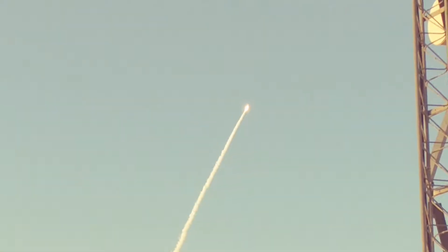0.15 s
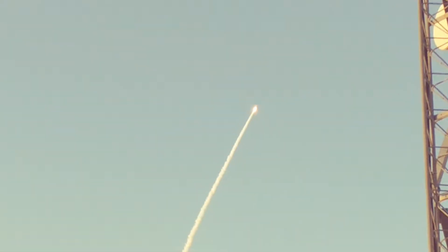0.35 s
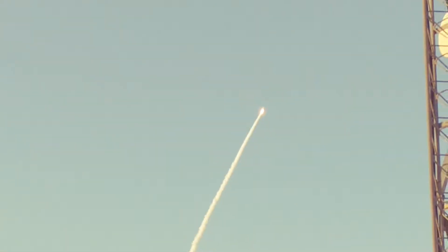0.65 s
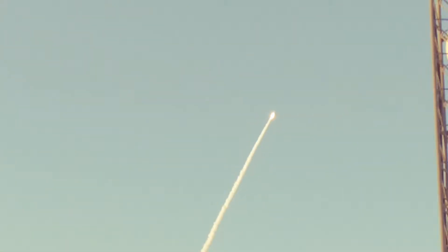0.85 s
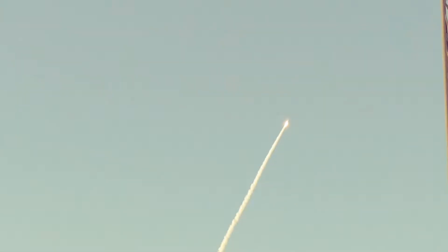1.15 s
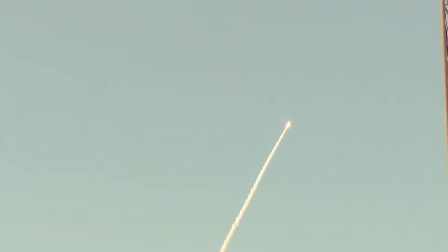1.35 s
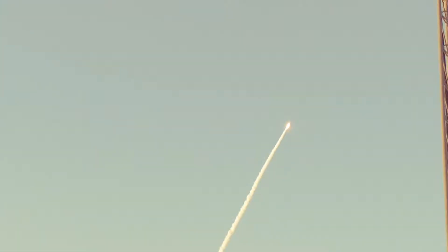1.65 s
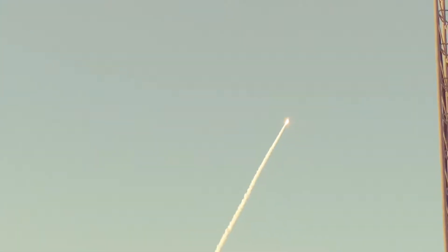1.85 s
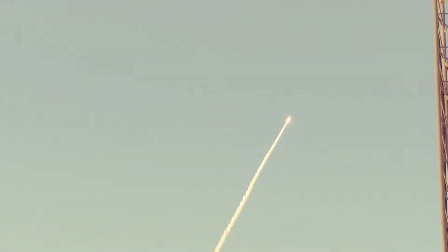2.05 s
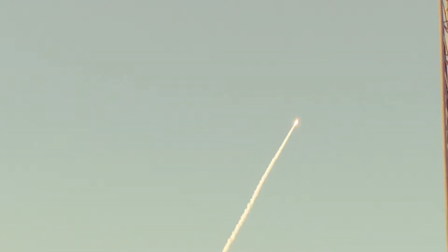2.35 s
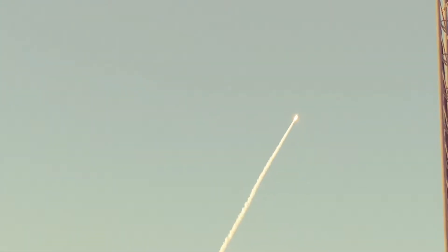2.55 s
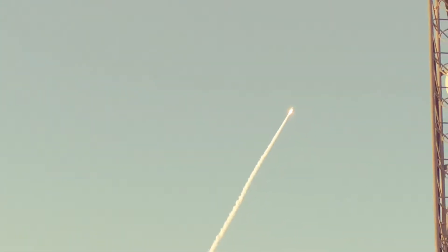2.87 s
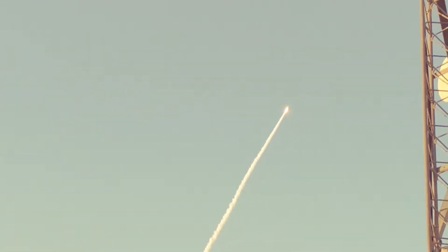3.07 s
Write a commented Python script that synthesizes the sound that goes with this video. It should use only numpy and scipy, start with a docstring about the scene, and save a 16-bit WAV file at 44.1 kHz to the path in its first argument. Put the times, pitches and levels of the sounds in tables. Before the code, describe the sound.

Dull continuous rocket roar far away over open ground; strong low wind buffets hit the microphone in the first half, then ease; close by, a machine whirs, clicks lightly and gives soft hissy puffs.

```python
"""Open ground, with a rocket far away. Its dull, steady roar blends with the whir of a machine nearby,
which hums faint tones and clinks about three times a second; soft puffs of treble hiss come between.
Roar, whir, hiss and wind are filtered noise; the hum is sines and narrow-band noise; the clinks are
decaying modes. Gusts buffet each microphone port on its own, and the strongest, on the left,
overload the input."""
import sys
import numpy as np
from scipy import signal
from scipy.fft import rfft, irfft, next_fast_len
from scipy.io import wavfile
from scipy.ndimage import uniform_filter1d

SR = 44100
rng = np.random.default_rng(int(sys.argv[2]) if len(sys.argv) > 2 else 0)


def field_ratio(decibels):
    """Amplitude ratio for a level in dB (20 dB per decade); scalars and array-likes work."""
    return 10 ** (np.asarray(decibels, dtype=float) / 20)


def materialize(psi):
    """Save the field psi as 16-bit PCM at rate SR to the path in sys.argv[1].

    A 1-D psi becomes a single channel; in a 2-D psi each row is a channel.
    """
    bounded = np.clip(np.atleast_2d(psi).T, -1, 1)
    quanta = np.round(bounded * 32767).astype(np.int16)
    wavfile.write(sys.argv[1], SR, quanta)


N = 141561
SIZE = next_fast_len(N + SR)   # length of the noise spectra, in samples
HZ = np.arange(SIZE // 2 + 1) * SR / SIZE

# Spectrum of far roar and machine whir together:
# (frequency [Hz], right density [dB per Hz], left minus right [dB], left-right likeness [0-1])
ROAR_SPECTRUM = [(40.4, -58, -10, 0.6), (61, -63.5, -0.5, 0.39), (95.6, -41.5, -10.5, 0),
                 (154, -50, 0.5, 1), (247, -51.5, -1.5, 0.98), (350, -55.5, -3.0, 0.38), (403, -58, -11, 1),
                 (481, -55, 0, 0.81), (754, -50.5, -5, 0.88), (790, -61.5, -1, 0.3), (926, -61, -5.5, 0.5),
                 (1020, -62.5, -3, 0.3), (1280, -59.5, -19.5, 0.7), (1450, -59.5, -14, 0),
                 (1666, -55.5, -18, 1), (2130, -60, -9.5, 0.7), (2210, -53.5, -8.5, 0.76),
                 (2574, -59, -8.5, 0.8), (3000, -62.5, -5, 0), (3123, -68, -3.0, 0.4),
                 (3590, -79.5, 1, 0.09), (4550, -81.5, -4.5, 0.6), (5530, -79.0, -1.5, 0.09),
                 (6380, -80, -2.5, 0.6), (7100, -86, -17, 0.4), (7700, -83, -1, 0.06),
                 (8640, -78.5, -2, 0.9), (8630, -73.5, -4, 0.22), (9810, -80, -4, 0),
                 (9860, -87, -13.5, 0.5), (11100, -91, -24.5, 0.7), (12000, -90, -12, 0),
                 (12800, -126, -23, 0.43), (14000, -99.0, -37, 0.36), (14600, -107.0, -35, 0.41)]
# Hum of the machine: (frequency [Hz], rms before panning [dB])
HUM_TONES = [(360.7, -32), (484.5, -38.5), (721.4, -41.5), (796.7, -43.5), (1082, -53.5), (1200, -48),
             (1351, -41.5), (1470, -44.5), (1626, -42), (1787, -39), (1895, -41), (2396, -49), (2848, -41)]
# Clinks of the machine: (time [s], level [dB], left minus right [dB], gain of the dull modes [dB])
CLINK_EVENTS = [(0.269, -27.5, -4, -20), (.889, -32, -2, -20), (1.05, -33, 0, 1), (1.209, -33, 3, -20),
                (1.511, -30, -10, -23), (1.82, -39, -1, -12), (2.137, -33, 11, -8), (2.45, -42, -2, 12),
                (2.63, -44, -5, -10), (2.756, -29.5, -7, -24), (3.069, -32, 6, -20)]
# Thin modes of a clink: (frequency [Hz], mean level [dB], 60 dB decay time [s])
BRIGHT_MODES = [(7470, -14, .03), (9200, -8.5, .02), (10800, -15, .02), (11720, -15, .05),
                (12700, -16, .04), (13600, -22, .02), (14400, -24, .02)]
# Duller modes of a clink: (frequency [Hz], mean level [dB], 60 dB decay time [s])
DULL_MODES = [(3860, -6, 0.018), (4600, -18, .015), (5400, -16, .03), (5830, -6, .015)]
# Puffs of treble hiss: (middle time [s], length [s], peak rms [dB])
HISS_PUFFS = [(0.392, 0.1, -41), (0.866, 0.29, -45.5), (1.224, 0.09, -45), (1.6, 0.22, -49),
              (2.192, 0.11, -42), (3.13, 0.16, -45.5)]
# Spectral shape of the hiss: (frequency [Hz], relative density [dB per Hz])
HISS_SPECTRUM = [(3000, -30), (6000, -12), (7500, -8), (9000, -2), (10400, -10), (12000, -8), (13000, -14),
                 (15500, -26)]
# Wind on the left port, before the surge: (time [s], large eddies [dB], small eddies [dB])
LEFT_GUSTS = [(0.0, -20, -31), (0.125, -8, -20), (0.175, -8, -26), (0.225, -12.5, -7), (0.275, -3, -25),
              (0.3, -29, -40), (0.325, -13, -14.5), (0.35, -4, -18), (0.45, -8, -4), (0.5, -9.5, -23),
              (0.525, -7, -9.5), (0.575, -4, -7), (0.625, -1.5, -9.5), (0.675, -13, -16), (0.725, -6, -23),
              (0.775, -5, -2), (0.85, -12.5, -48), (0.875, -16, -38), (0.975, -15.5, -36), (1.05, -8, -19),
              (1.125, -8, -16), (1.15, -3.5, -4), (1.2, -13, -26), (1.25, -2.5, -16), (1.275, -8, -11),
              (1.3, -5, -14), (1.325, -11, -7.5), (1.35, -17, -14), (1.375, -13, -24), (1.4, -7, -30),
              (1.425, -7, -9.5), (1.475, -14, -41), (1.6, -16, -28), (1.65, -6, -15), (1.75, -19.5, -42),
              (1.825, -6.5, -14.5), (1.975, -21, -46), (2.6, -18.5, -27.5), (2.625, -7.5, -22),
              (2.7, -20, -17.5), (2.75, -11, -26.5), (2.925, -23.5, -30), (3.0, -13, -26),
              (3.075, -20.5, -38), (3.15, -4, -18.5), (3.2, -16.5, -34)]
# Wind on the right port, before the surge: (time [s], large eddies [dB], small eddies [dB])
RIGHT_GUSTS = [(0.0, -24.5, -40), (0.125, -15.5, -26), (0.25, -18, -44), (0.425, -20.5, -41),
               (0.45, -18, -16), (0.475, -11, -5), (0.525, -8, -19), (0.55, -22, -11), (0.575, -12, -39),
               (0.625, -16, -24), (0.675, -6, -6.5), (0.725, -20.5, -23), (0.775, -7, -18), (0.8, -14, -20),
               (0.825, -22, -30), (0.925, -20, -32), (1.0, -13, -41), (1.05, -19, -28), (1.1, -8.5, -14.5),
               (1.225, -13.5, -41), (1.25, -7, -23), (1.3, -24, -45), (1.35, -15.5, -21.5), (1.4, -17, -31),
               (1.55, -24, -27), (1.725, -21, -39), (1.95, -27.5, -30), (2.475, -22, -36),
               (2.5, -11.5, -18.5), (2.525, -24, -20), (2.55, -12.5, -20), (2.65, -25, -32),
               (2.7, -13, -34), (2.775, -37, -27), (2.825, -25.5, -27), (3.2, -28.5, -45)]
# Spectral shape of large eddies at a port: (frequency [Hz], relative density [dB per Hz])
LARGE_EDDIES = [(15, -70), (30, -39), (42, 1), (60, 4.5), (90, 1), (130, -1), (170, -11), (260, -38),
                (2000, -140)]
# Spectral shape of small eddies at a port: (frequency [Hz], relative density [dB per Hz])
SMALL_EDDIES = [(90, -34), (140, 4), (190, 1), (280, -6), (400, -12.5), (700, -33.5), (1500, -63),
                (5000, -140)]

FLUTTER_DB, FLUTTER_HZ = 0.9, 3.8   # spread and corner rate of the roar's level
WHIR_FROM_HZ, WHIR_LAG_MS = 1000, 0.23   # the machine rules above this; its lag at the right port
HUM_WIDTH_HZ, HUM_PAN_DB = 6.8, -4   # offset at half amplitude; left minus right
HUM_STEADY = 0.43   # share of the power in pure tones
CRACK_DB, CRACK_DECAY_S = -11, 0.008   # gain of the crack noise; time to fall to 1/e
TOUCH_GAP_S = 0.006   # nominal time between the touches of a clink
CALM_DB = (-26, -31)   # level whose power is taken off large and small eddies
SURGE, SURGE_FROM_DB = 0.8, -10   # extra dB per dB of gust above this level
LUMP_DB, LUMP_HZ = 2, 34   # spread and corner rate of the lumps in the wind
EVEN_S, EVENNESS = 0.05, 0.6   # averaging time; share of the noise's own swings taken out
LOW_CUT_HZ = 34
OVERLOAD, KNEE = 1.0, 22   # limiting amplitude; sharpness of the knee


def rms_one(x):
    """Normalization: the mean square becomes 1."""
    return x / np.sqrt(np.mean(x ** 2) + 1e-20)


def at_hz(table, axis):
    """Interpolation of one spectral column on a log-frequency axis."""
    table = np.array(table)
    return np.interp(np.log(HZ + 1), np.log(table[:, 0]), table[:, axis])


def white():
    """White noise: a flat spectrum of 0 dB per Hz."""
    return rfft(rng.standard_normal(SIZE)) * np.sqrt(SR / 2)


def drift(corner_hz):
    """Random modulation: low-passed noise of rms 1."""
    return rms_one(irfft(white() / (1 + (HZ / corner_hz) ** 2), SIZE)[:N])


def late():
    """Interaural-style delay: a phase lag at the right port that fades in with frequency."""
    lag_s = WHIR_LAG_MS / 1000 / (1 + (WHIR_FROM_HZ / (HZ + 1)) ** 4)
    return np.exp(-2j * np.pi * HZ * lag_s)


def roar():
    """Partial coherence: roar and whir are coloured noise, partly shared by the ports."""
    alike = np.clip(at_hz(ROAR_SPECTRUM, axis=3), 0, 1)
    shared = np.sqrt(alike) * white()
    own = np.sqrt(1 - alike)
    left = (shared + own * white()) * field_ratio(at_hz(ROAR_SPECTRUM, axis=2))
    right = shared * late() + own * white()
    spectra = np.array([left, right]) * field_ratio(at_hz(ROAR_SPECTRUM, axis=1))
    return irfft(spectra, SIZE)[:, :N] * field_ratio(FLUTTER_DB * drift(FLUTTER_HZ))


def hum():
    """Resonance: each tone is part pure sine, part noise in a narrow band that wavers."""
    t = np.arange(SIZE) / SR
    shape, pure = 0, 0
    for hz, db in HUM_TONES:
        shape = shape + field_ratio(db) / (1 + ((HZ - hz) / HUM_WIDTH_HZ) ** 2)
        pure = pure + field_ratio(db) * np.sqrt(2) * np.sin(2 * np.pi * (hz * t + rng.random()))
    shape = shape / np.sqrt(np.pi / 2 * HUM_WIDTH_HZ)   # each band keeps the rms of its tone
    tones = white() * shape * np.sqrt(1 - HUM_STEADY) + rfft(pure) * np.sqrt(HUM_STEADY)
    left = tones * field_ratio(HUM_PAN_DB / 2)
    right = tones * late() * field_ratio(-HUM_PAN_DB / 2)
    return irfft(np.array([left, right]), SIZE)[:, :N]


def clinks():
    """Modal impact: three quick touches, each a crack of noise and briefly ringing modes."""
    out = np.zeros((2, N + SR))
    t = np.arange(SR // 8) / SR
    hz, level_db, t60 = np.transpose(BRIGHT_MODES + DULL_MODES)[:, :, None]
    dull = np.arange(len(hz))[:, None] >= len(BRIGHT_MODES)
    crack_band = signal.butter(2, [6500, 13000], "band", fs=SR, output="sos")
    for s, db, pan_db, dull_db in CLINK_EVENTS:
        pan = np.array([[pan_db], [-pan_db]]) / 2
        for touch in range(3):
            mode_db = level_db + dull * dull_db + rng.normal(0, 4, hz.shape)
            rings = field_ratio(mode_db - 60 * t / t60) * np.sin(2 * np.pi * hz * t)
            crack = signal.sosfilt(crack_band, rng.standard_normal((2, len(t))))
            crack = crack * np.exp(-t / CRACK_DECAY_S)
            sound = rings.sum(axis=0) + field_ratio(CRACK_DB) * crack
            i = int((s + touch * TOUCH_GAP_S * rng.uniform(0.84, 1.2)) * SR)
            out[:, i:i + len(t)] += sound * field_ratio(db - 3 * touch + pan)
    return out[:, :N]


def hiss():
    """Amplitude modulation: treble noise, independent at each port, under bell-shaped swells."""
    t = np.arange(N) / SR
    swell = sum(field_ratio(db) * np.exp(-(2 * (t - s) / length) ** 2) for s, length, db in HISS_PUFFS)
    spectra = np.array([white(), white()]) * field_ratio(at_hz(HISS_SPECTRUM, axis=1))
    return swell * rms_one(irfft(spectra, SIZE)[:, :N])


def eddies(spectrum):
    """Turbulence: coloured noise of rms 1 whose own level swings are partly evened out."""
    x = irfft(white() * field_ratio(at_hz(spectrum, axis=1)), SIZE)[:N]
    width = int(EVEN_S * SR)
    power = uniform_filter1d(uniform_filter1d(x ** 2, size=width), size=width // 2)
    return rms_one(x / (power + 1e-12) ** (EVENNESS / 2))


def wind(gusts):
    """Turbulent pressure: large and small eddies buffet one port in low-pitched lumps."""
    s, *levels = np.transpose(gusts)
    out = 0
    for spectrum, level_db, calm_db in zip((LARGE_EDDIES, SMALL_EDDIES), levels, CALM_DB):
        db = np.interp(np.arange(N) / SR, s, level_db)
        db = db + SURGE * np.maximum(db - SURGE_FROM_DB, 0)
        power = field_ratio(db) ** 2 - field_ratio(calm_db) ** 2
        out = out + np.sqrt(np.maximum(power, 1e-6)) * eddies(spectrum)
    out = out * field_ratio(LUMP_DB * drift(LUMP_HZ))
    low_cut = signal.butter(4, LOW_CUT_HZ, "high", fs=SR, output="sos")
    return signal.sosfilt(low_cut, out)


def scene():
    """Superposition: roar, hum, clinks and hiss add to the wind on each port."""
    gusts = np.array([wind(LEFT_GUSTS), wind(RIGHT_GUSTS)])
    return gusts + roar() + hum() + clinks() + hiss()


def top_cut(x):
    """Nothing passes above the cut-off."""
    return signal.sosfilt(signal.butter(12, 15620, fs=SR, output="sos"), x)


def record(dry):
    """Saturation: the input limits the strongest gusts with a slightly rounded knee."""
    mix = dry / (1 + np.abs(dry / OVERLOAD) ** KNEE) ** (1 / KNEE)
    return top_cut(mix)


dry = scene()
out = record(dry)
materialize(out)
```